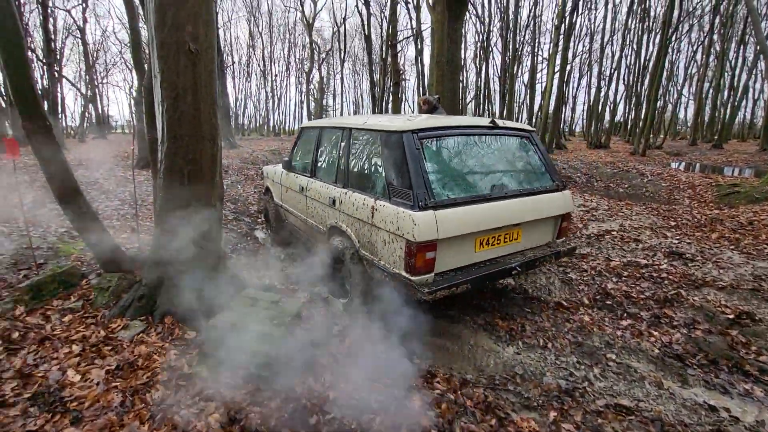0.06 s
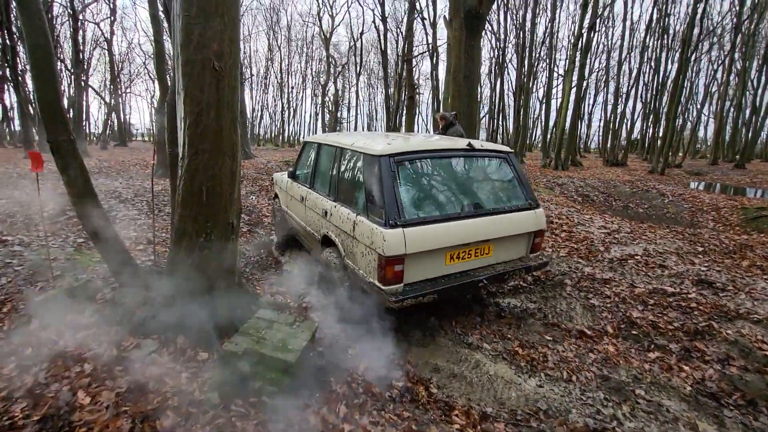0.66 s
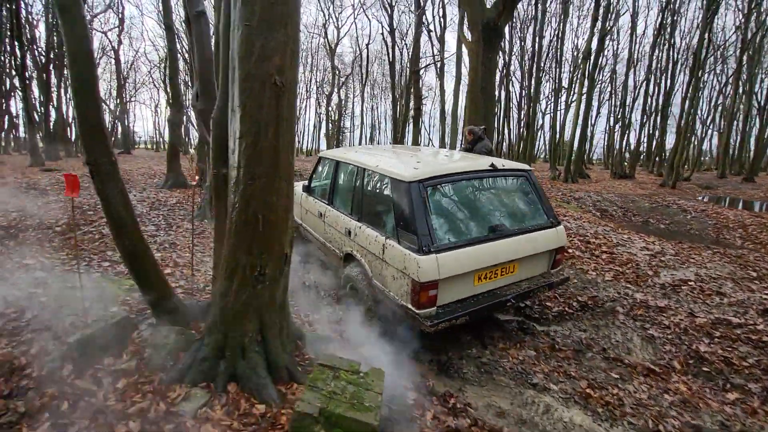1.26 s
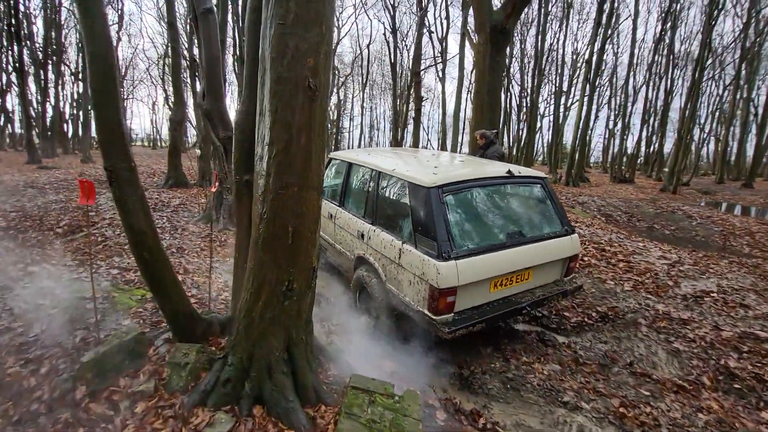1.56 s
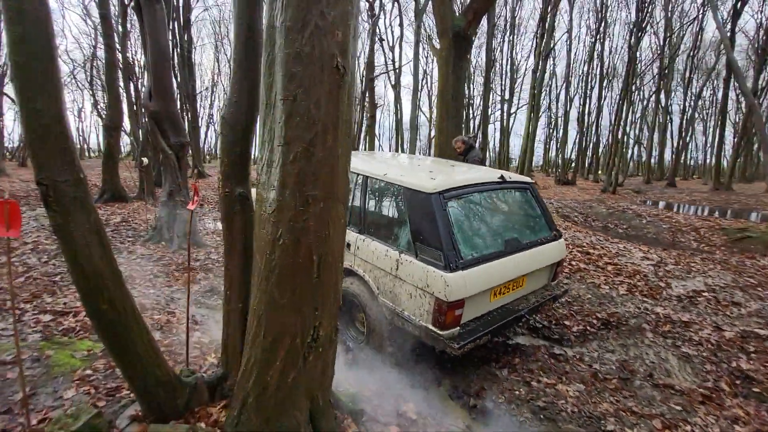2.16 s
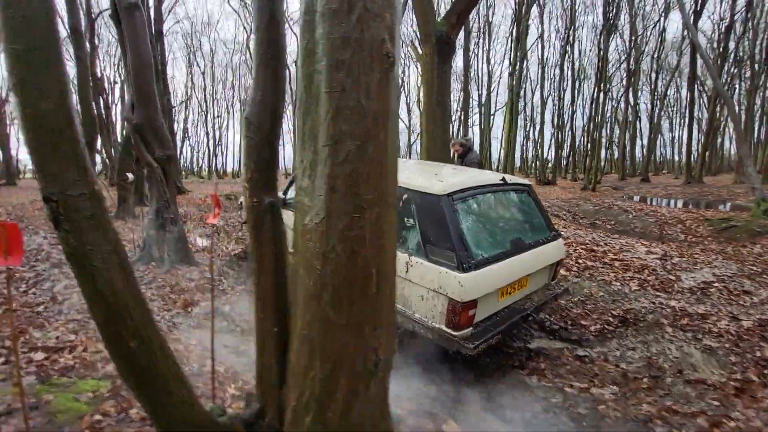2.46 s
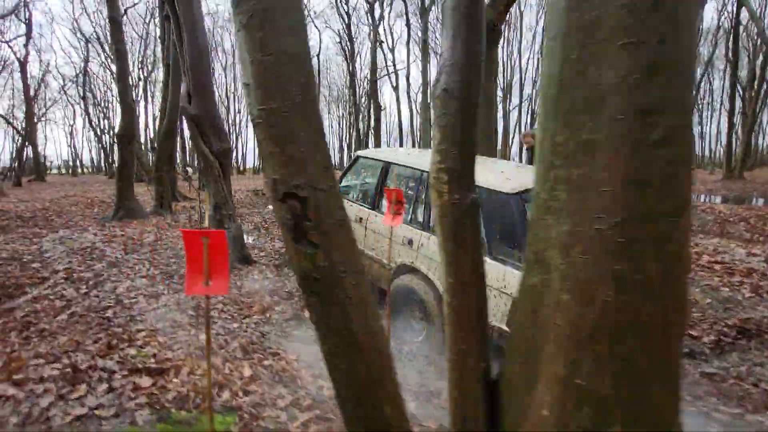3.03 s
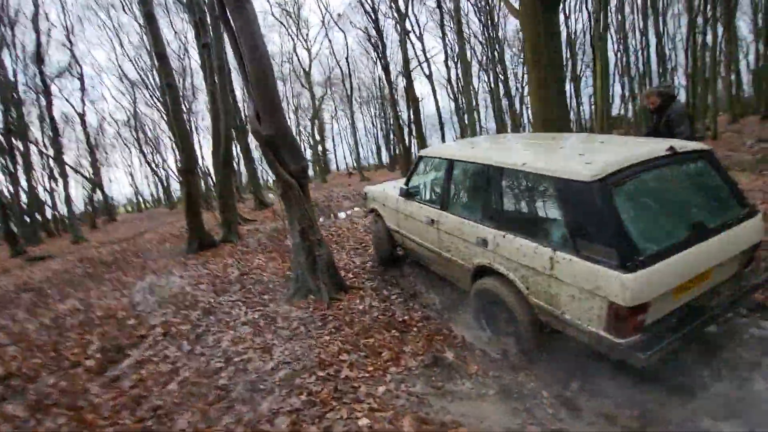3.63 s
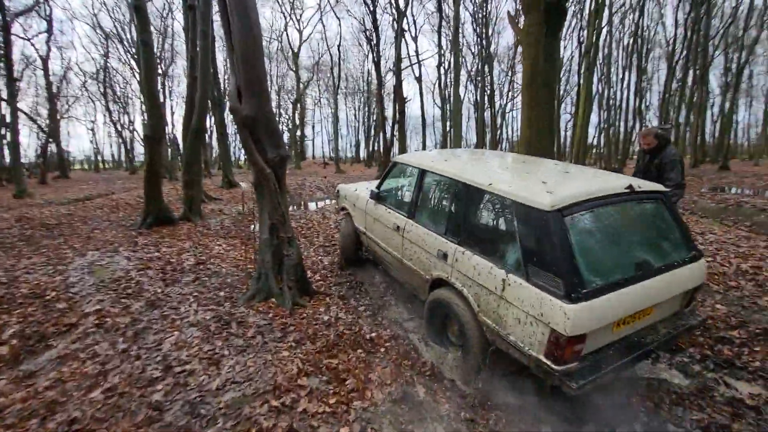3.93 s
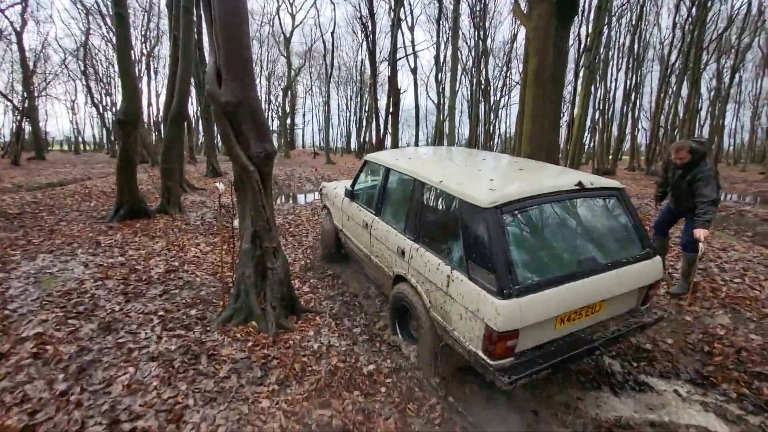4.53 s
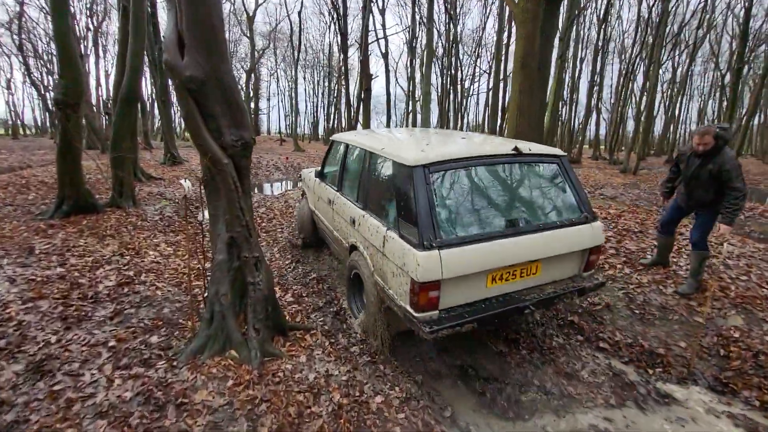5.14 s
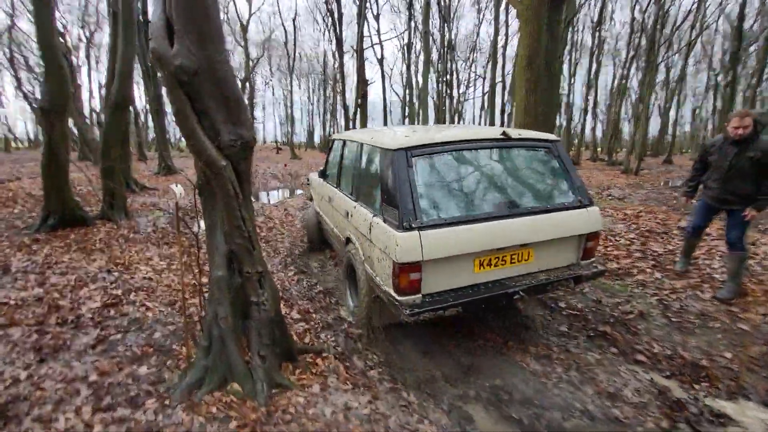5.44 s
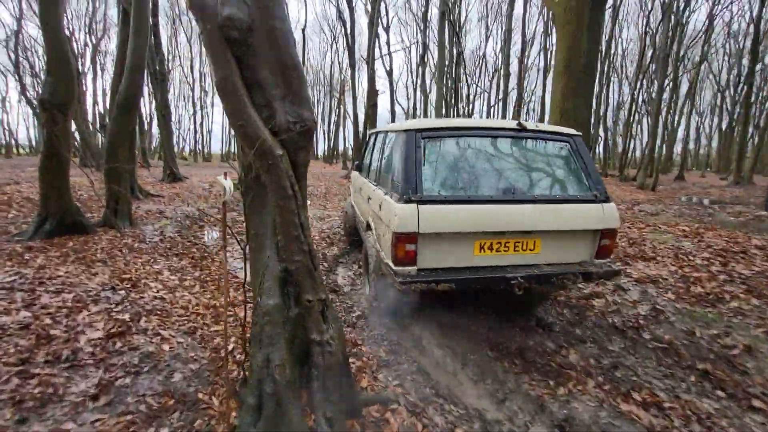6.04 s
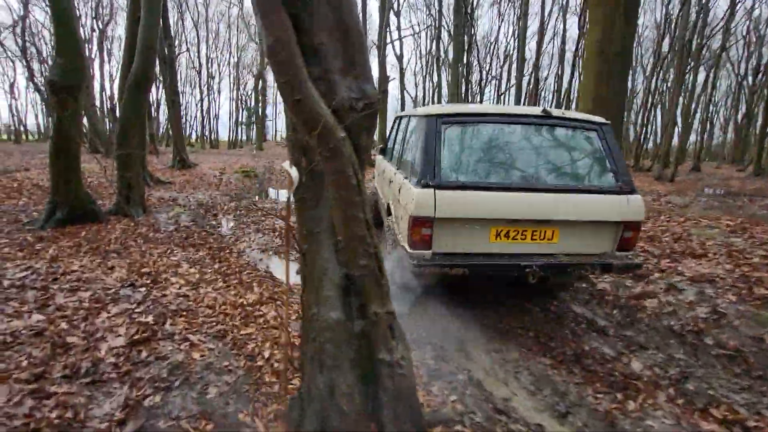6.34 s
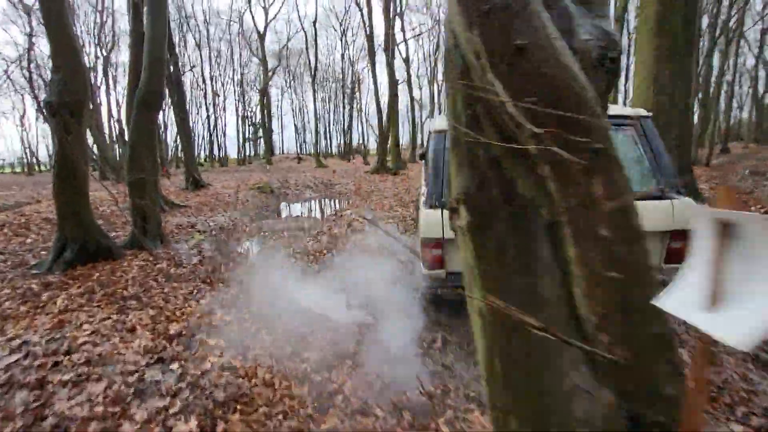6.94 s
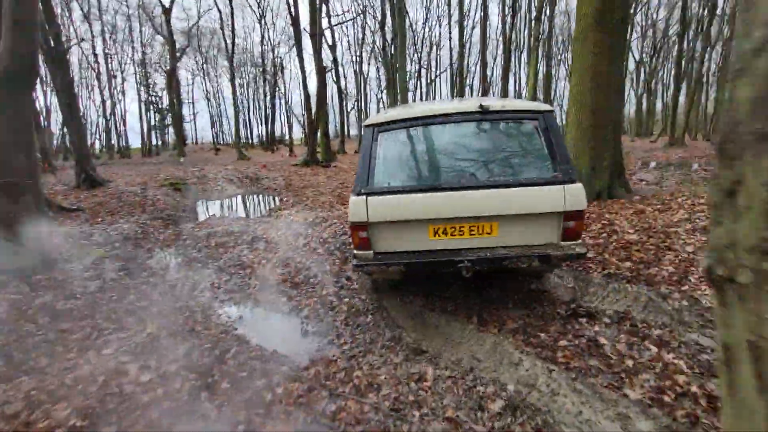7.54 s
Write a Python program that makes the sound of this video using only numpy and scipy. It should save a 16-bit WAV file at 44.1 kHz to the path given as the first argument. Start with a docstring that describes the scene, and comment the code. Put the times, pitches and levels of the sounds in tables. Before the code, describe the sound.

A large petrol V8 throbs unevenly near idle a few metres away in a wood, with light mechanical clatter over its deep exhaust. Twigs snap and the chassis knocks a few times in the first second and a half. At about 1.7 seconds the throttle opens hard and the revs peak just after 2 seconds. The engine eases slightly, then labours in a steady drone from 3 to 5.5 seconds, rising a little, with soft groans. Throughout, tyres crackle over wet leaves and churn mud, with scattered small cracks. Around 6 seconds the revs sink to a lumpy idle. A second hard surge comes at about 6.8 seconds, with a few knocks and a hiss of muddy spray. From 7.3 seconds a cluster of twigs snaps as the revs fall and the vehicle moves a little further off. The trunks echo faintly.

```python
"""A throbbing petrol V8: an off-roader crawls through mud and wet leaves in a wood, a few metres away.
Eight uneven firings a cycle ring the silencer; the throttle is opened hard twice.
Gas puffs from the tailpipe, the engine bay clatters; low drones and higher groans swell and fade.
The tyres churn and spray, twigs snap under them, the chassis knocks and the trunks echo faintly."""
import sys
import numpy as np
from scipy import signal
from scipy.fft import rfft, irfft, next_fast_len
from scipy.io import wavfile
from scipy.ndimage import uniform_filter1d, minimum_filter1d, map_coordinates

SR = 44100
rng = np.random.default_rng(int(sys.argv[2]) if len(sys.argv) > 2 else 0)


def file_out(sig):
    """Save sig as 16-bit WAV at sys.argv[1]."""
    # one column per channel
    cols = np.atleast_2d(sig).T
    # limit, then scale
    lim = np.clip(cols, -1, 1)
    pcm = np.round(lim * 32767).astype(np.int16)
    wavfile.write(sys.argv[1], SR, pcm)


N = 343728
T = np.arange(N) / SR
HZ = np.fft.rfftfreq(N, 1 / SR)
NEAR_M, EDGE_HZ = 5, 15850

# throttle load: t/s, effort over idle/dB
EFFORT = [(0, 0.5), (.33, -2), (.7, 0), (1.58, 1), (1.74, 8), (1.94, 10.5), (2.18, 3), (3.0, 3), (4.05, 6),
          (4.6, 5), (5.2, 1.35), (5.56, 1.5), (6.0, -5), (6.35, -3), (6.7, 1), (6.93, 11.5), (7.28, 8.5),
          (7.65, -3.5)]
# listener catches up, vehicle pulls away: t/s, distance/m, ground echo gain
PATH = [(0, 5.03, 0.4), (.65, 4.88, 0.5), (1.2, 5.16, .25), (2.6, 5.68, 0.07), (3.5, 4.34, 0.07),
        (4.5, 5.16, 0), (5.4, 4.16, 0), (6.3, 6.14, 0), (7.79, 7.54, 0.1)]
# a trunk screens the engine: centre/s, length/s, level/dB
SHADOWS = [(3.0, 1.1, -7.5), (6.58, 0.61, -3.5)]


def firings(idle_rough=0.3, fast_rough=0.07, jitter_ms=0.17):
    """One impulse per firing; combustion is uneven at low revs and firms up under load."""
    # manifold paths in firing order: delay/ms, level/dB
    cylinders = [(1.58, -2.5), (0.89, 0.9), (0.74, 3), (0.12, -4.5), (1.45, 1.45), (1.41, 0), (-0.17, 0.5),
                 (1.28, 0)]
    rate_hz = firing_hz()
    fired = np.floor(np.cumsum(rate_hz) / SR + 1.15).astype(int)
    at = np.flatnonzero(np.diff(fired))
    delay_ms, db = np.array(cylinders)[fired[at] % len(cylinders)].T
    strength, timing = rng.standard_normal((len(at), 2)).T
    rough = np.interp(rate_hz[at], [65, 105], [idle_rough, fast_rough])
    rough *= gain_of(-np.maximum(curve(EFFORT)[at], 0))
    at += np.round((delay_ms + jitter_ms * timing) * SR / 1000).astype(int)
    pulses = np.zeros(N)
    pulses[np.clip(at, 0, N - 1)] = gain_of(db) * (1 + rough * strength)
    return pulses


def exhaust(pulses, turbulence=0.027, split_hz=152, deep_hz=80, drone_hz=197, drone_width_hz=8):
    """Firings ring the silencer; under load it barks, and drones where twice their rate hits resonance."""
    # silencer and tailpipe: f/Hz, level/dB
    response = [(10, -74.5), (22, -36), (34, -30), (43, -3.5), (60, 1), (80, 0), (100, 4), (127, -1),
                (150, -12), (175, -10.5), (203, -8), (230, -19), (270, -31.5), (305, -36.5), (329, -33),
                (355, -49.5), (600, -79)]
    gas = turbulence * evened(puffs(pulses, decay_s=0.012, steady=0.71)[0]) - evened(pulses)
    pipe = rfft(colour(gas, gain_of(read(response, HZ)))[0])
    low = 1 / (1 + (HZ / split_hz) ** 12)
    deep = 1 / (1 + (HZ / deep_hz) ** 12)
    deep_gain = gain_of(np.interp(firing_hz(), [66, 105], [-2, 4.5]))  # idle puffs carry little gas
    boom = deep_gain * irfft(pipe * deep, N) + irfft(pipe * (low - deep), N)
    bark = irfft(pipe * (1 - low), N)
    in_tune = 1 / (1 + ((2 * firing_hz() - drone_hz) / drone_width_hz) ** 2)
    drone_db = 1.19 * np.clip(curve(EFFORT), 0, 6) * in_tune
    boom_db = level_db(-16.5, per_effort=1.2534, per_octave=-1.26, per_revving=-0.6)
    bark_db = level_db(-32, per_effort=0.43, per_octave=0.26, per_revving=4)
    return steadied(boom) * gain_of(boom_db) + steadied(bark) * gain_of(bark_db + drone_db)


def gas_rush(pulses, shaded=0.4, buzz=0.8):
    """Gas puffs from the tailpipe with a slight firing buzz; trunks screen it only in part."""
    # gas noise: f/Hz, level/dB
    spectrum = [(100, -6), (230, 12), (320, 0), (450, 0.5), (600, -0.5), (720, -2), (850, -14),
                (1300, -25.5), (3000, -51)]
    gas = puffs(pulses, decay_s=0.0036, steady=2.5) + buzz * evened(pulses)
    rush = voiced(gas, gain_of(read(spectrum, HZ)), 270, 1000)
    rush_db = level_db(-45.5, per_effort=0.59, per_octave=3.5, per_revving=-1)
    return rush * gain_of(rush_db + shaded * swells_db(SHADOWS))


def engine_bay(pulses, waver_db=1.5):
    """Valve gear and manifold ticks ring the panels, more under load, over a broad mechanical wash."""
    # panels and covers: f/Hz, half-width/Hz, level/dB
    modes = [(750, 45, -3.5), (1102, 202, 0), (1371, 36, 0), (1988, 165, -2.5)]
    # mechanical wash: f/Hz, level/dB
    wash_spectrum = [(400, -25.5), (850, 1.5), (1020, 3.5), (1400, 0.5), (1700, 1), (2200, -9.5),
                     (3000, -15.5), (6000, -28.5)]
    panel_power = sum((gain_of(db) / (1 + ((HZ - hz) / width) ** 2)) ** 2 for hz, width, db in modes)
    ring = voiced(puffs(pulses, decay_s=0.004, steady=1.0), np.sqrt(panel_power), 900, 2300)
    wash = voiced(puffs(pulses, decay_s=0.0017, steady=3.3), gain_of(read(wash_spectrum, HZ)), 810, 2700)
    ring_share = np.clip(0.36 + 0.058 * curve(EFFORT), 0, 1)
    clatter = np.sqrt(ring_share) * ring + np.sqrt(1 - ring_share) * wash
    clatter_db = level_db(-46.5, per_effort=0, per_octave=2.5, per_revving=3.5)
    return clatter * gain_of(clatter_db + swells_db(SHADOWS) + waver_db * drift(24))


def tyres(clump_db=2.0, lump_db=0.14, spray_slip=0.85):
    """Wet leaves crackle in clumps under the treads; effort and wheel slip throw muddy spray."""
    # crushed leaves: f/Hz, level/dB
    leaf_spectrum = [(300, 4), (1000, 3.5), (2200, 9.5), (3000, 2.5), (4100, 0.5), (5200, 1.5), (6000, 3.5),
                     (7100, 5), (7800, 0), (8600, -24), (15000, -32.5)]
    # fine spray: f/Hz, level/dB
    spray_spectrum = [(3000, -13), (7500, -5), (8600, -2), (10000, 0), (11400, -5.5), (12800, 0),
                      (15700, 0), (17000, -11)]
    # wheel slip: centre/s, length/s, level/dB
    slips = [(1.82, .7, 4.2), (2.99, 0.23, 4.5), (3.54, 0.87, 6.5), (4.45, 1.8, 6), (5.5, 1.2, 4),
             (6.09, 0.48, 6.5), (6.42, 0.46, 4.5), (7.04, .2, 9.5), (7.38, 1.07, 10), (7.79, 0.34, 9)]
    wet = 1.22 * gain_of(0.34 * curve(EFFORT))
    crush = evened(grains(per_s=1400, spread_db=4.5) + wet * rng.standard_normal((2, N)))
    crackle = np.array([steadied(side) * gain_of(clump_db * drift(rate_hz))
                        for side, rate_hz in zip(crush, (29, 35))])
    leaves = voiced(crackle, gain_of(read(leaf_spectrum, HZ)), 2800, 8000)
    drops = grains(per_s=1600, spread_db=6.0) + wet * rng.standard_normal((2, N)) + crackle
    spatter_db = 0.9 * drift(60) + 0.4 * drift(16)
    spray = voiced(drops * gain_of(spatter_db), gain_of(read(spray_spectrum, HZ)), 9500, 15000)
    churn_db = swells_db(slips) - lump_db * drift(7)
    leaves_db = level_db(-53.5, per_effort=0.19, per_octave=-0.9, per_revving=0.46) + churn_db
    spray_db = level_db(-63, per_effort=0.15, per_octave=0.4, per_revving=1.7) + spray_slip * churn_db
    return ground_echo(leaves * gain_of(leaves_db) + spray * gain_of(spray_db))


def twigs(per_bed=14, spread_db=3, spread_octaves=0.5):
    """Large twigs snap under the tyres; small twigs and grit crack at random."""
    # large twigs: t/s, level/dB, f/Hz
    snaps = [(0.4907, -32.5, 3040), (0.6416, -30.5, 3400), (.6952, -47, 3400), (.82, -30.5, 3400),
             (0.94, -45, 3800), (1.074, -34.5, 4190), (1.3059, -34.5, 3800), (1.7454, -31, 3800),
             (3.676, -35, 2000), (4.172, -31.5, 4200), (6.0564, -35, 6000), (6.0987, -37, 7000),
             (6.4494, -36, 6000), (7.331, -31, 3800), (7.426, -33, 3300), (7.538, -24.5, 3040),
             (7.6, -29, 3320), (7.666, -30, 2600), (7.684, -32, 2800), (7.7318, -28, 3400)]
    # patches of small cracks: one edge/s, roughly the other edge/s (either order), level/dB, f/Hz
    beds = [(0, 3.7, -40, 3400), (3.2, 7.6, -40, 3780), (7.25, 7.1, -39, 3600)]
    cracks = [(a_s + (b_s - a_s) * abs(when), db + spread_db * size, hz * 2 ** (spread_octaves * pitch))
              for a_s, b_s, db, hz in beds for when, size, pitch in rng.uniform(-1.1, 1, (per_bed, 3))]
    out = np.zeros((2, N))
    for at_s, db, hz in snaps + cracks:
        add(out, at_s, gain_of(db) * burst(hz, t60_s=0.024, octaves=1.8, tail=0.06))
    return out


def chassis_knocks():
    """Chassis and wheels knock in short, narrow-band blows."""
    # blows: t/s, level/dB, f/Hz, t60/s
    knocks = [(.523, -30, 1320, 0.098), (1.119, -27.5, 880, 0.22), (1.411, -32.5, 2103, 0.044),
              (6.497, -29, 380, 0.046), (6.498, -32, 1140, .04), (6.843, -32, 1230, 0.066),
              (7.216, -29.5, 1200, 0.14), (7.687, -29, 1420, 0.061)]
    out = np.zeros((2, N))
    for at_s, db, hz, t60_s in knocks:
        add(out, at_s, gain_of(db) * burst(hz, t60_s, octaves=0.73, tail=0.035))
    return out


def narrow_swells():
    """Narrow-band swells: low ones are exhaust overtones droning, higher ones groans and scrubs."""
    # swells: peak/s, rise and fall each/s, f/Hz, nominal width/Hz, level/dB
    swells = [(0.148, .7, 980, 133, -46), (0.202, .6, 320, 40, -47.5), (1.597, 0.95, 658, 90, -46),
              (1.744, 0.59, 1960, 129, -50.5), (1.8, 0.51, 1120, 130, -41.5), (1.95, .4, 1400, 90, -44.5),
              (2.101, .5, 445, 159, -38.5), (2.121, .6, 257, 50, -35), (3.8, 0.67, 455, 110.5, -44),
              (4.648, 0.55, 1050, 170, -42), (5.17, .55, 321, 40, -40.5), (5.302, .45, 1380, 109, -45),
              (5.371, .35, 706, 85, -39), (6.889, .16, 1220, 131, -41), (7.544, 0.27, 5400, 450, -58)]
    out = np.zeros((2, N))
    for peak_s, rise_s, hz, width_hz, db in swells:
        size = next_fast_len(int(2 * rise_s * SR))
        resonance = 1 / (1 + ((np.fft.rfftfreq(size, 1 / SR) - hz) / (0.78 * width_hz)) ** 2)
        swell = evened(irfft(rfft(rng.standard_normal((2, size))) * resonance, size)) * np.hanning(size)
        skipped = max(round((rise_s - peak_s) * SR), 0)
        add(out, peak_s - rise_s, gain_of(db) * swell[:, skipped:])
    return stereo(out)


def ground_echo(x, near_delay_ms=0.246):
    """A bounce off wet ground combs the treble; its lag shrinks with distance, so the notches slide."""
    delayed_s = T - near_delay_ms / 1000 * NEAR_M / curve(PATH)
    strength = curve(PATH, column=2)
    echo = np.array([map_coordinates(side, [delayed_s * SR], order=3) for side in x])
    return (x + strength * echo) / np.sqrt(1 + strength ** 2)


def trunk_echoes(x, t60_s=0.45, per_s=900, first_s=0.015):
    """Sparse echoes off the trunks, different on each side."""
    t = np.arange(SR // 2) / SR
    taps = rng.standard_normal((2, len(t))) * (rng.random((2, len(t))) < per_s / SR)
    taps *= (t > first_s) * gain_of(-60 * t / t60_s)
    return signal.fftconvolve(x[None], taps / np.linalg.norm(taps[0]), axes=1)[:, :N]


def firing_hz(flywheel_s=0.15):
    """Firing rate; the flywheel rounds every change."""
    # engine speed: t/s, firing rate/Hz
    rates = [(0.0, 72.6), (0.75, 62.2), (1.15, 67.5), (1.6, 70.2), (2.1, 129.7), (2.71, 99.7), (3.01, 94.2),
             (3.89, 97.5), (4.32, 106.2), (4.8, 110.3), (5.55, 110.2), (6.03, 73.0), (6.34, 61.9),
             (6.67, 60.5), (7.12, 107.3), (7.34, 107.5), (7.79, 67.3)]
    return uniform_filter1d(curve(rates), size=int(flywheel_s * SR), mode="nearest")


def level_db(idle_db, per_effort, per_octave, per_revving, idle_hz=70, linger_s=0.1):
    """Level at the listener; slopes in dB per dB of effort, octave of speed and octave/s of rev-up."""
    octaves = np.log2(firing_hz() / idle_hz)
    pole = np.exp(-1 / (linger_s * SR))
    revving = signal.lfilter([1 - pole], [1, -pole], np.maximum(np.gradient(octaves) * SR, 0))
    source_db = idle_db + per_effort * curve(EFFORT) + per_octave * octaves + per_revving * revving
    return source_db - 20 * np.log10(curve(PATH) / NEAR_M)


def puffs(pulses, decay_s, steady):
    """Noise that flares at each firing over a steady floor."""
    flare = evened(signal.lfilter([1], [1, -np.exp(-1 / (decay_s * SR))], pulses))
    return (steady + flare) * rng.standard_normal((2, N))


def grains(per_s, spread_db):
    """Random clicks, most small, a few large."""
    size = gain_of(spread_db * np.minimum(rng.exponential(1, (2, N)), 4))
    return evened(size * rng.choice([-1, 1], (2, N)) * (rng.random((2, N)) < per_s / SR))


def burst(hz, t60_s, octaves, tail):
    """Band-limited noisy blow with a faint tail; peak 1."""
    t = np.arange(SR // 4) / SR
    noise = rng.standard_normal((2, len(t))) * (gain_of(-60 * t / t60_s) + tail * np.exp(-t / 0.016))
    edges_hz = [hz / 2 ** (octaves / 2), min(hz * 2 ** (octaves / 2), EDGE_HZ)]
    sound = signal.sosfilt(signal.butter(2, edges_hz, "bandpass", fs=SR, output="sos"), noise)
    return sound / np.abs(sound).max()


def stereo(pair, lag_ms=0.056):
    """Two unrelated signals become left and right, alike in the bass, leaning right in the treble."""
    # stereo image: f/Hz, likeness 0-1, left minus right/dB
    image = [(200, 0.93, -3), (500, 0.91, 0.5), (1200, 0.54, -5), (2600, 0.17, -3), (5530, 0.01, -0.2),
             (9000, 0.13, -5.5), (14000, 0.1, -10)]
    a, b = rfft(pair)
    same = np.clip(read(image, HZ), 0, 1)
    lean = gain_of(read(image, HZ, column=2) / 2)
    mid, side = a * np.sqrt(1 + same), b * np.sqrt(1 - same)
    lag = np.exp(-2j * np.pi * HZ * lag_ms / 1000)
    return irfft(np.array([(mid + side) * lean, (mid - side) / lean * lag]) / np.sqrt(1 + same), N)


def voiced(drive, gain, lo_hz, hi_hz):
    """Filters a drive and spreads it in stereo; mono rms 1 inside the band."""
    pair = stereo(colour(drive, gain))
    in_band = irfft(rfft(pair.mean(0)) * ((HZ > lo_hz) & (HZ < hi_hz)), N)
    return pair / np.std(in_band)


def colour(x, gain):
    """Minimum-phase filter with the given gain at each of HZ."""
    log_gain = np.log(np.maximum(gain, 1e-5))
    log_response = np.conj(signal.hilbert(np.r_[log_gain, log_gain[-2:0:-1]]))
    ring = np.fft.ifft(np.exp(log_response)).real[:SR // 5]
    return signal.fftconvolve(np.atleast_2d(x), ring[None], axes=1)[:, :N]


def steadied(x, window_s=0.35):
    """Holds rms at 1 across engine cycles, keeping the throb inside each."""
    window = np.hanning(int(window_s * SR))
    power = signal.fftconvolve(x ** 2, window, "same") / signal.fftconvolve(np.ones(N), window, "same")
    return x / np.sqrt(np.abs(power) + 1e-20)


def drift(rate_hz):
    """Slow noise of rms 1."""
    return evened(irfft(rfft(rng.standard_normal(N)) * np.exp(-(HZ / rate_hz) ** 2), N))


def swells_db(rows):
    """One smooth arch per row, summed."""
    return sum(db * np.cos(np.pi * np.clip((T - centre_s) / length_s, -0.5, 0.5)) ** 2
               for centre_s, length_s, db in rows)


def curve(rows, column=1):
    """Table column at every sample."""
    rows = np.array(rows)
    return np.interp(T, rows[:, 0], rows[:, column])


def read(rows, hz, column=1):
    """Table column over log frequency."""
    rows = np.array(rows)
    return np.interp(np.log(hz + 1), np.log(rows[:, 0] + 1), rows[:, column])


def add(mix, at_s, sound):
    """Mixes in a two-channel sound."""
    part = mix[:, max(round(at_s * SR), 0):][:, :sound.shape[1]]
    part += sound[:, :part.shape[1]]


def gain_of(db):
    """Decibels to gain."""
    return 10 ** (np.asarray(db) / 20)


def evened(x):
    """Scales to rms 1."""
    return x / np.sqrt(np.mean(x ** 2) + 1e-20)


def scene(wood_db=-24, lean_db=0.4):
    """The vehicle among the trees."""
    pulses = firings()
    engine = exhaust(pulses) * gain_of([[lean_db], [-lean_db]]) + gas_rush(pulses) + engine_bay(pulses)
    direct = engine + narrow_swells() + tyres() + stereo(twigs() + chassis_knocks())
    return direct + gain_of(wood_db) * trunk_echoes(direct.mean(0))


def record(dry, ceiling=0.94):
    """Peak limiter, then a steep low-pass."""
    allowed = np.minimum(1, ceiling / (np.abs(dry).max(0) + 1e-9))
    limited = dry * uniform_filter1d(minimum_filter1d(allowed, size=1201), size=1201)
    lowpass = signal.firwin(511, EDGE_HZ, window=("kaiser", 9), fs=SR)
    return signal.oaconvolve(limited, lowpass[None], "same")


dry = scene()
out = record(dry)
file_out(out)
```